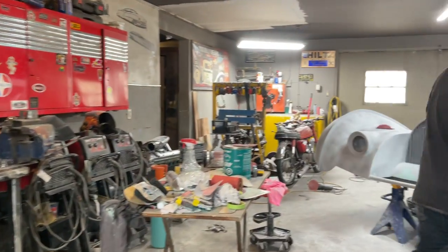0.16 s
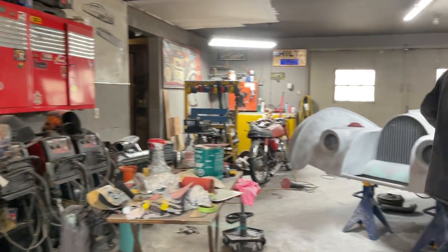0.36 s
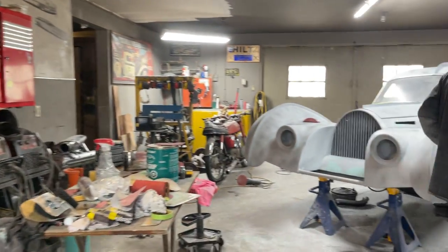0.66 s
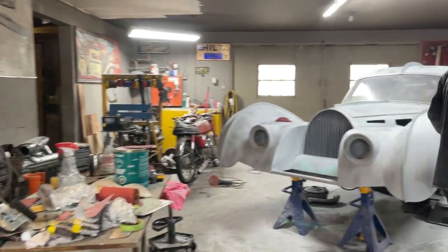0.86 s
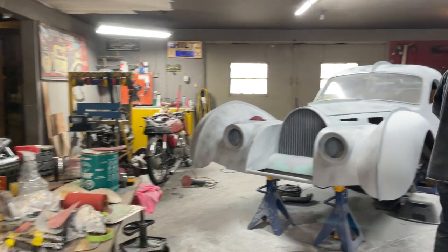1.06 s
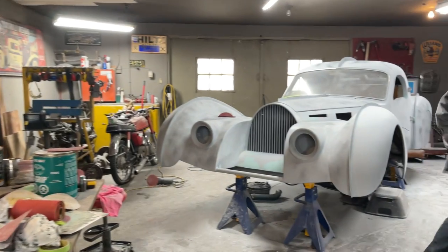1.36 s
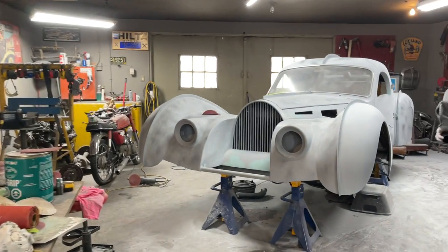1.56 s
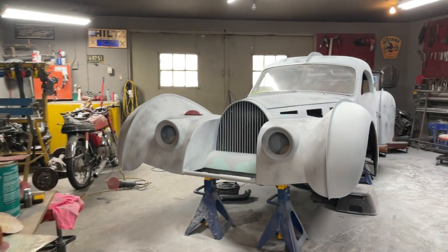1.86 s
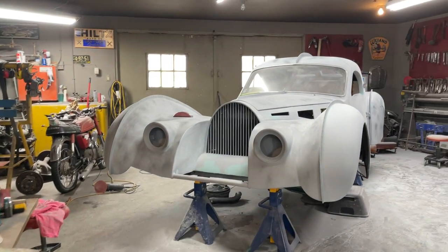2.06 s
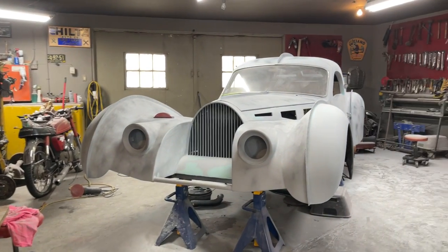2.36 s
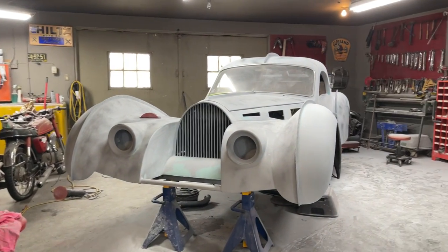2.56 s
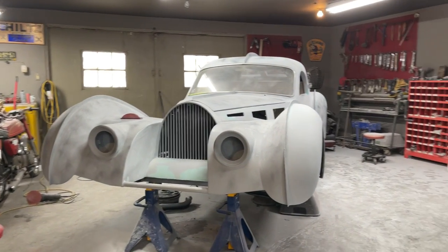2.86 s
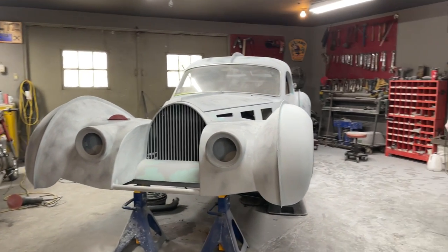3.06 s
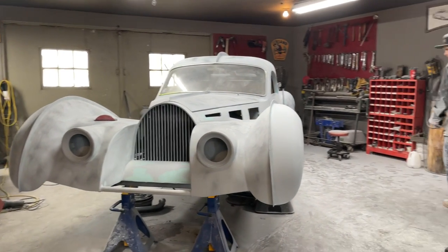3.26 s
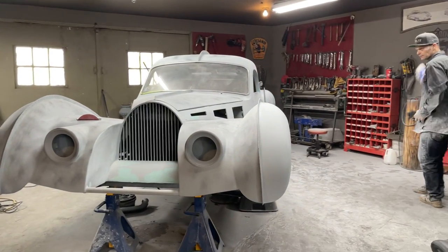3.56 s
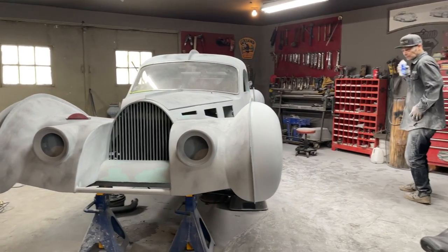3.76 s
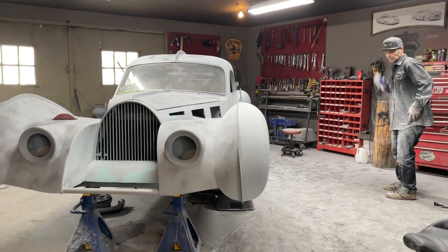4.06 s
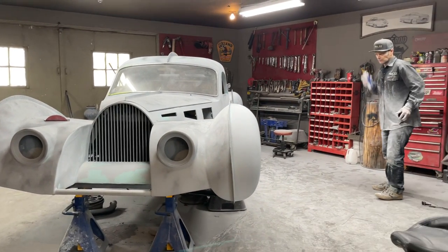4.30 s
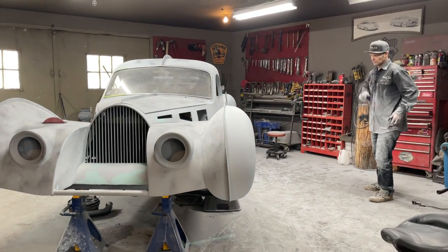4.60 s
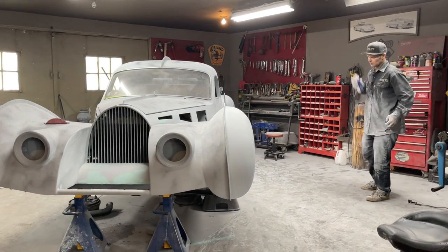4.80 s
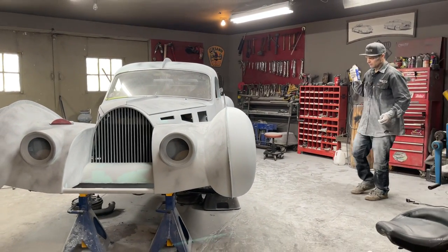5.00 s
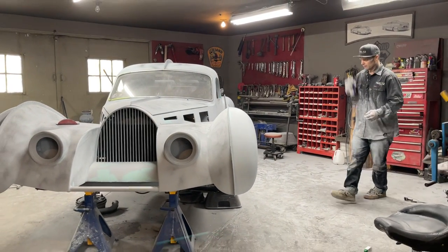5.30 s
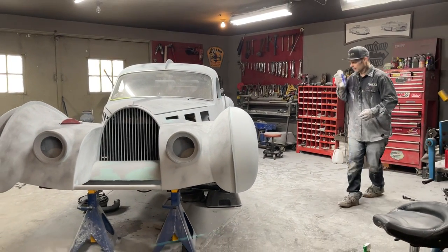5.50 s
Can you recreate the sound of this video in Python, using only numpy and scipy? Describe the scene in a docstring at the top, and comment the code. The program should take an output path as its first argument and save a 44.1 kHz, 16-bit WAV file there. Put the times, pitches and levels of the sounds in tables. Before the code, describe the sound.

A spray can is handled and shaken in a concrete workshop. At the start there is quiet hiss and a soft scuff, then a clear hollow knock at about 0.2 s, faint bright metal clinks from 0.3 to 0.7 s, and a small loose ball rattle with a rub near 0.5-0.6 s. From about 0.77 s the shaking begins and runs to the end at about 5.6 s, roughly four strokes a second. Each stroke opens with one or two sharp, heavily damped metallic clacks, then lighter irregular taps bounce toward the duller wall. Faint grainy paint slosh runs underneath. A slight knock and scuff near 3.2 s are almost buried. Short near echoes blur the hits and a diffuse tail follows, its treble dying first. Low air and hand rumble swells slightly around 4.8 s, with occasional dull microphone bumps. The hardest blows flatten and distort a little.

```python
"""A rattling steel ball: a spray can is picked up and shaken in a concrete workshop, about four strokes a second.
The ball hits the can's ends and bounces along the wall; paint and hand damp most of its rings to a few ms.
Before and between come knocks, clinks and scuffs of handling, with the slosh of paint during the shaking.
Nearby surfaces give short echoes, walls and floor a diffuse tail, behind it all a flickering hiss.
Air and hand movement rumble on the microphone, whose input overloads on the hardest blows."""
import sys
import numpy as np
from scipy import signal
from scipy.io import wavfile
from scipy.ndimage import uniform_filter1d

SR = 44100
rng = np.random.default_rng(int(sys.argv[2]) if len(sys.argv) > 2 else 0)


def output_pcm(signal):
    """Save a mono or channel-first signal as 16-bit PCM at the path in sys.argv[1].

    Samples are clipped to [-1, 1] before scaling.
    """
    pcm = np.clip(np.atleast_2d(signal).T, -1, 1) * 32767
    wavfile.write(sys.argv[1], SR, np.round(pcm).astype(np.int16))


N = 248635  # samples


# distinct ball impacts inside the can: start_s [s], peak_db [dB],
# wall_db [dB, wall thud re dome ring], tick_db [dB, tick re dome ring]
BALL_HITS = [(0.5229, -15.5, -6, -4.5), (.5628, -17.5, -8, -8), (0.573, -21, 1, -10), (0.5819, -25, 0, -8),
             (.634, -29.5, 7, -2), (0.7673, -8, -21, -7.5), (0.7931, -2.5, -12.5, -9),
             (0.7995, -16.5, -16, -19), (0.8083, -18, -1, -21), (0.8658, -11.5, -2, -8),
             (0.8707, -17, 6, -17), (0.9184, -22, -4, -13), (.953, 4.5, -12.5, -7.5),
             (0.9592, -22, -12, -5), (0.9629, -10, -15, -21), (1.0205, -13.5, -14, -7),
             (1.0817, -15, 0, -4), (1.1166, -18, -5, -5), (1.1872, -23, -2, -24), (1.191, 3.5, -12.5, -17),
             (1.233, -3.5, -23, -14), (1.2527, -17.5, -10, -3), (1.2641, -14.5, -8, -24),
             (1.3205, -16.5, -1, -4), (1.3521, -23, 7.5, -21), (1.4277, -4, -16, -11.5),
             (1.4298, -1, -9.5, -16), (1.4831, -18, -1, -13), (1.5651, -15.5, -3.5, 0),
             (1.6492, 3.5, -21, -14.5), (1.6633, -1.8, -12, -16), (1.6804, -5.5, -10, -18),
             (1.7126, -16, -22, -12), (1.7281, -16.5, -5, -12), (1.738, -14.4, -18, -8),
             (1.8056, -15, -1, -4.5), (1.8799, 3, -22, -12), (1.8982, -8.5, -7, -12.5),
             (1.9253, -12.5, -8, -17), (1.9722, -13.5, -15, -6.5), (1.9834, -16, 2, -13),
             (2.0033, -21, 4, -6), (2.047, -11, -2.5, -0.5), (2.1291, 3.5, -9.5, -9),
             (2.135, -21, -12, -12), (2.1444, -16, -30, -15), (2.1514, -16, -19, -1),
             (2.1723, -2.5, -35, -7), (2.1842, -11.5, -7.5, -1), (2.1904, -14.5, -14, -8),
             (2.1975, -16, -5, -4), (2.256, -15, 0, -4.5), (2.3582, 4, -13, -38), (2.3918, -6.5, -7, -31),
             (2.3957, -14, -10, -18), (2.451, -16, -8, -1), (2.5235, -12.5, -0.5, -7), (2.56, -18, 0, -4.5),
             (2.611, 0.5, -32, -11), (2.6245, -5, -12, -14), (2.6448, -4.5, -25, -16),
             (2.67, -14, -1.5, -7), (2.6874, -9, -12, -8), (2.6948, -17, -1, -3.5), (2.7042, -13.5, -3, -7),
             (2.786, -11.5, -7.5, -7.5), (2.8663, 0.5, -15, -14), (2.878, -0.5, -8.5, -13),
             (2.9, -12.5, -22, -9.5), (2.9988, -19.5, 9, -20), (3.0281, -17.5, -6, -3),
             (3.0435, -16.5, 2, -19), (3.0738, -24.5, 0, -3), (3.1046, 0, -9.5, -13),
             (3.1221, -5, -7.5, -24), (3.151, -10.5, -19, -13), (3.182, -11.5, -7, -11),
             (3.1945, -14.5, -2, -1), (3.2052, -8.5, -13, -7), (3.2152, -21, -2, -19),
             (3.2594, -11, -0.5, -8.5), (3.2664, -19, 11, 1), (3.307, -22, 5, -8), (3.357, -3, -14, -24),
             (3.3597, -15.5, 3, -25), (3.367, -6, -8, -25), (3.377, -24, -15, -12),
             (3.3883, -10.5, -11, -16), (3.4598, -7, -8, -8.5), (3.5273, -11, -5.5, -6),
             (3.6246, -1, -9, -8.5), (3.6254, 3, -22, -22), (3.6319, -9, -24, -20), (3.6643, -5.5, -18, -8),
             (3.7477, -17, -2, 0), (3.8425, 2.3, -11.5, -11.5), (3.8517, -19, -24, -13),
             (3.869, -2, -28, -15), (3.8833, -7.5, -18, -11), (3.903, -12, -8.5, -22),
             (3.9298, -15.5, -7, -12), (3.9363, -17.5, -1, -3), (3.9436, -13, -30, -10),
             (3.973, -19, 3, -11), (4.0246, -13, -7.5, -6), (4.1026, 3.5, -8, -12), (4.1107, -17, -34, -1),
             (4.1254, -11, -4, -15), (4.1515, -4.5, -12, -8), (4.1645, -16, -28, -23), (4.173, -16, -5, -5),
             (4.2313, -11, -5, -11), (4.2336, -15.5, 1, -5), (4.28, -17.5, 0, -9), (4.3345, -1.5, -8, -17),
             (4.3888, -7, -16, -22), (4.3968, -20, -21, -6), (4.416, -15, -9, -8), (4.4763, -15, 1, -3),
             (4.518, -19.5, -3, 0), (4.5657, 1.5, -11, -11), (4.587, -3.5, -9.5, -16),
             (4.6132, -18, -20, -8), (4.6233, -8, -12, -29), (4.6628, -10.5, -6.5, -14),
             (4.674, -17.5, -9, -5), (4.6845, -18, 17, -10), (4.7372, -18, 1, -8), (4.824, 2.5, -13.5, -9),
             (4.8561, -7.5, -10, -28), (4.882, -15, -25, -9), (4.9263, -16, -6, -4.5),
             (4.9871, -13, -3, -36), (5.0694, 2, -8.5, -8.5), (5.1217, -3.5, -20, -10),
             (5.125, -7.3, -13, -23), (5.1718, -7, -8.5, -10), (5.2558, -12, -8.5, -5),
             (5.2597, -20, 0, -5), (5.34, -4, -8, -11.5), (5.346, -1.5, -29, -14),
             (5.3488, -4, -1.5, -15.5), (5.3709, -17, 4, -8), (5.3867, -3.5, -32, -12),
             (5.3967, -13, -22, -5), (5.4686, -11, -1.5, -12), (5.5707, 2, -12, -12),
             (5.5955, 0, -36, -9.5)]
# a low thump as the microphone's input overloads on the hardest blows: start_s [s], peak_db [dB]
HARD_THUDS = [(0.955, -27), (2.3576, -26), (3.6249, -18.5)]
# broad, heavily damped resonances of the filled can; all: pitch_hz [Hz], width_hz [Hz], level_db [dB, relative]
WALL_PEAKS = [(1046, 660, -3), (1780, 620, 1.5)]
DOME_PEAKS = [(2610, 890, -2.5), (3546, 810, 1.5), (4500, 1270, -1.5), (6066, 1970, -6.5)]
# bright tick of the ball's contact: same columns
TICK_PEAKS = [(7825, 1930, 4.5), (12440, 3300, -7)]
# longer rings of the thin shell: same columns
SHELL_PEAKS = [(2400, 180, -6), (3170, 130, 1), (3730, 130, 3), (4540, 81, 3), (5500, 180, 0)]
# the low thud under the blows: same columns
THUD_PEAKS = [(263, 660, 0)]
# surfaces near the can: mean_delay_s [s], mean_level_db [dB re the hit's peak]
NEAR_ECHOES = [(.006, -22), (.0095, -23), (.015, -32)]
CHATTER_S, TICK_DECAY_S = 0.00073, 0.0021  # time constants: contact chatter, force behind the tick
SHELL_DB = -21  # shell ring re dome ring
THUD_DB, THUD_SPREAD_DB = -32.5, 3.6  # low thud re dome ring: mean and spread
ECHO_SHIFT_S, ECHO_SPREAD_DB = 0.00095, 5.1  # spread of each echo


def ball():
    """Each impact is a sharp blow with a brief random chatter, coloured by wall, dome and ball."""
    start_s, peak_db, wall_db, tick_db = np.vstack([BALL_HITS, taps()]).T
    size = 1024
    t = np.arange(size) / SR
    brief = np.exp(-t / TICK_DECAY_S)  # the treble dies first

    def can(force):
        """Dome, wall and tick resonate side by side under one force."""
        smooth = band(force, 446, 15000)
        dome = resonate(smooth, DOME_PEAKS)
        wall = undb(wall_db)[:, None] * resonate(smooth, WALL_PEAKS)
        tick = undb(tick_db)[:, None] * resonate(smooth * brief, TICK_PEAKS)
        return dome + wall + tick

    blow = np.zeros((len(start_s), size))
    blow[:, 6] = 2.52
    chatter = rng.standard_normal(blow.shape) * np.exp(-t / CHATTER_S)
    force = blow + chatter
    heard = can(force)

    # the thin shell sings on faintly; blows also carry a faint low thud
    shell = undb(SHELL_DB) * resonate(force, SHELL_PEAKS)
    thud_db = THUD_DB + THUD_SPREAD_DB * rng.standard_normal((len(start_s), 1))
    thud = undb(thud_db) * resonate(blow, THUD_PEAKS)
    direct = place(start_s - .0002, peak_db, heard + shell + thud, rise_s=0.00018)
    hard_thuds = resonate(blow[:len(HARD_THUDS)], THUD_PEAKS)
    direct = direct + place(*np.transpose(HARD_THUDS), hard_thuds, rise_s=0.00044)

    # the can keeps moving, so near echoes shift in time and strength from hit to hit
    chance = rng.standard_normal((len(start_s), len(NEAR_ECHOES), 2))
    echo = band(heard, 540, 10000, order=1)
    for k, (delay_s, echo_db) in enumerate(NEAR_ECHOES):
        echo_s = start_s + delay_s + ECHO_SHIFT_S * chance[:, k, 0]
        level_db = peak_db + echo_db + ECHO_SPREAD_DB * chance[:, k, 1]
        direct = direct + place(echo_s, level_db, echo, rise_s=0.00029)

    # the room sums all directions and hears a more even colour; hits take turns at five spots
    spread = can(blow) + 0.63 * heard
    spot = np.arange(len(start_s)) % 5
    tail = 0
    for k in range(5):
        here = spot == k
        tail = tail + workshop(place(start_s[here], peak_db[here], spread[here], rise_s=0.00024))
    return direct + tail


SLAM_DB, STROKE_GAP_S = -7.5, .15  # a blow above this level after such a pause opens a stroke
FLIGHT_S = .03  # the ball flies free just before the next stroke
TAPS_PER_STROKE = 5
TAP_DB, TAP_SPREAD_DB, TAP_FADE_DB_PER_S = -22, 2.5, 16.5
# mean wall and tick levels re dome ring, their spread, and the wall's rise through the stroke
TAP_WALL_DB, TAP_TICK_DB, TAP_COLOUR_DB, TAP_WALL_DB_PER_S = -9, -8, 5, 60


def taps():
    """Light random taps fade and move from dome to wall through each stroke; rows like the ball's blows."""
    hit_s, hit_db = np.transpose(BALL_HITS)[:2]
    hard_s = hit_s[hit_db > SLAM_DB]
    stroke_s = hard_s[np.diff(hard_s, prepend=0) > STROKE_GAP_S]
    length_s = np.diff(stroke_s, append=N / SR + FLIGHT_S) - FLIGHT_S
    # one tap at a random moment in each equal share of the stroke
    share = np.arange(TAPS_PER_STROKE) + rng.random((len(stroke_s), TAPS_PER_STROKE))
    late_s = (share / TAPS_PER_STROKE * length_s[:, None]).ravel()
    chance = rng.standard_normal((len(late_s), 3)).T
    start_s = np.repeat(stroke_s, TAPS_PER_STROKE) + late_s
    peak_db = TAP_DB - TAP_FADE_DB_PER_S * late_s + TAP_SPREAD_DB * chance[0]
    wall_db = TAP_WALL_DB + TAP_WALL_DB_PER_S * late_s + TAP_COLOUR_DB * chance[1]
    tick_db = TAP_TICK_DB + TAP_COLOUR_DB * chance[2]
    return np.transpose([start_s, peak_db, wall_db, tick_db])


SHAKE_START_S, SLOSH_DB = 0.755, -56  # the slosh's start and rms level


def paint():
    """Liquid thrown about inside the can: a grainy slosh of noise with a fast random level."""
    fade_in = np.clip((np.arange(N) / SR - SHAKE_START_S) / 0.048, 0, 1)
    slosh = band(rng.standard_normal(N), 900, 4000, order=1) * undb(4 * walk(200))
    return fade_in * undb(SLOSH_DB) * unit(slosh)


# hollow knocks, most as the can is picked up: start_s [s], peak_db [dB], crack_db [dB, gain of the noisy crack]
KNOCK_HITS = [(.127, -28.5, -11), (.2145, -10, -13), (.2175, -16, 9.5), (0.2248, -22.5, 15),
              (3.234, -27, -15)]
# hollow modes of the knocks: pitch_hz [Hz], level_db [dB, relative], t60_s [s]
KNOCK_RINGS = [(244, -12.5, 0.028), (567, -7.5, 0.034), (790, -0.5, 0.03), (970, -6, 0.031),
               (1800, -9.5, 0.022), (2940, -13, 0.019)]


def knocks():
    """Hollow knocks: low, short-lived modes with a noisy crack."""
    start_s, peak_db, crack_db = np.transpose(KNOCK_HITS)
    return struck(start_s, peak_db, KNOCK_RINGS, crack_db, rise_s=0.00095)


# small metal clinks: start_s [s], peak_db [dB]
CLINK_HITS = [(.319, -22.5), (.353, -26), (.358, -23), (.381, -38), (.396, -43), (.48, -36.5), (.641, -38),
              (.675, -37), (.701, -42), (.711, -41)]
# bright modes of the clinks: pitch_hz [Hz], level_db [dB, relative], t60_s [s]
CLINK_RINGS = [(1750, -12, .01), (3300, -10, .008), (4000, -8, .01), (4450, -2, .016), (4600, -3, .016),
               (6700, -6, .008), (7750, -3, .016), (8600, -9, .008), (10800, -10, .008), (12500, -14, .01)]


def clinks():
    """Small metal clinks: high modes gone within some 16 ms, with a strong noisy crack."""
    start_s, peak_db = np.transpose(CLINK_HITS)
    crack_db = np.full(len(start_s), 11)
    return struck(start_s, peak_db, CLINK_RINGS, crack_db, rise_s=0.00028)


# soft scuffs of hand, can and shoes, and one brief slosh of paint (0.58 s): centre_s [s], length_s [s, between
# 1/e points], level_db [dB, rms before the swell], pitch_hz [Hz, band centre]
SCUFF_RUBS = [(0.04, 0.025, -46, 490), (0.176, 0.053, -47.5, 1800), (0.424, 0.21, -55, 4500),
              (.582, 0.05, -38.5, 1470), (0.721, 0.027, -55.5, 5500), (3.01, 0.029, -48.5, 500),
              (3.255, 0.097, -43, 790)]


def scuffs():
    """Short grainy rubs: one noise band each, swelling and fading smoothly."""
    t, out = np.arange(N) / SR, 0
    for centre_s, length_s, level_db, pitch_hz in SCUFF_RUBS:
        noise = band(rng.standard_normal(N), pitch_hz / 1.65, pitch_hz * 1.37)
        rub = unit(noise * undb(5.8 * walk(150)))
        swell = np.exp(-(2 * (t - centre_s) / length_s) ** 2)
        out = out + undb(level_db) * rub * swell
    return out


# the concrete workshop's tail by band: pitch_hz [Hz], level_db [dB, noise gain], t60_s [s]
ROOM_BANDS = [(310, -44, 0.91), (583, -46, 0.88), (1184, -43, 0.96), (2140, -46, 0.89), (3620, -42, 0.51),
              (5570, -45, 0.52), (7250, -51, 0.28), (10000, -38, 0.18), (13500, -49, 0.25)]
FIRST_WALL_S, BUILD_S = .004, .007  # silence before the tail, time constant of its growth


def workshop(dry):
    """A diffuse tail of noise bands builds after the first wall and dies sooner in the treble."""
    t = np.arange(int(1.1 * SR)) / SR
    build = 1 - np.exp(-np.maximum(t - FIRST_WALL_S, 0) / BUILD_S)
    reply = 0
    for pitch_hz, level_db, t60_s in ROOM_BANDS:
        noise = band(rng.standard_normal(len(t)), pitch_hz / 1.21, pitch_hz * 1.346)
        reply = reply + undb(level_db - 60 * t / t60_s) * noise
    return signal.fftconvolve(dry, reply * build)[:N]


# hiss of the room: pitch_hz [Hz], level_db [dB per Hz, relative]
AIR_BANDS = [(150, -16), (300, -8), (600, 4.5), (1500, -2), (4000, -10), (8000, -25), (15000, -50)]
AIR_DB = -55  # rms of the whole hiss


def air():
    """Quiet hiss of the room: noise bands, each flickering a little."""
    hiss = 0
    for pitch_hz, level_db in AIR_BANDS:
        flicker = undb(level_db + 3.5 * walk(7.6))
        hiss = hiss + flicker * band(rng.standard_normal(N), pitch_hz / 1.08, pitch_hz * 1.76)
    return undb(AIR_DB) * unit(hiss)


# drift of the rumble at the microphone: time_s [s], level_db [dB, deep band]
RUMBLE_DRIFT = [(0, -47), (2.76, -43), (4.38, -44), (4.84, -38.5), (5.64, -44.5)]
# dull bumps on the microphone: start_s [s], peak_db [dB], pitch_hz [Hz]
MIC_BUMPS = [(.721, -37.5, 94), (2.288, -35.5, 46), (2.638, -31, 62.3), (4.263, -37, 46), (4.501, -34, 72),
             (5.504, -35, 55)]
UPPER_RUMBLE_DB = -12.5  # upper band re deep band


def rumble():
    """Low pressure swings on the microphone share one uneven gust; bumps are single decaying sines."""
    time_s, level_db = np.transpose(RUMBLE_DRIFT)
    gust = walk(9)
    deep = unit(band(rng.standard_normal(N), 13.2, 28.1, order=1) * undb(2.9 * gust))
    upper = unit(band(rng.standard_normal(N), 53, 115, order=1) * undb(3.4 * gust))
    drift = undb(np.interp(np.arange(N) / SR, time_s, level_db))
    start_s, peak_db, pitch_hz = np.transpose(MIC_BUMPS)[..., None]
    thumps = rings(pitch_hz, 1 + 0 * pitch_hz, 7 / pitch_hz, 0 * pitch_hz, size=8192)
    bumps = place(start_s[:, 0], peak_db[:, 0], thumps, rise_s=0.0073)
    return drift * (deep + undb(UPPER_RUMBLE_DB) * upper) + bumps


def struck(times, peak_db, modes, crack_db, rise_s):
    """Blows on one object: its modes, stirred a little each time, plus a noisy crack."""
    size = 4096
    hz, db, t60 = np.transpose(modes)
    chance = rng.standard_normal((len(times), 3, len(hz)))
    pitch = hz * (1 + 0.0044 * chance[:, 0])
    gain = undb(db + 2.8 * chance[:, 1])
    tone = rings(pitch, gain, t60 + 0 * pitch, 0.74 * chance[:, 2], size)
    crack = band(rng.standard_normal((len(times), size)), 1360, 7000)
    crack = crack * np.exp(-np.arange(size) / SR / 0.0019)
    return place(times, peak_db, tone + undb(crack_db)[:, None] * crack, rise_s)


def resonate(x, peaks):
    """Parallel resonances of alternating sign along the last axis; each row leaves with unit energy."""
    y = 0
    for k, (hz, width_hz, db) in enumerate(peaks):
        b, a = signal.iirpeak(hz, hz / width_hz, fs=SR)
        y = y + (-1) ** k * undb(db) * signal.lfilter(b, a, x)
    return y / np.linalg.norm(y, axis=-1, keepdims=True)


def rings(hz, gain, t60, phase, size):
    """Sum of decaying sines; arguments are events x modes, the result events x size."""
    t = np.arange(size) / SR
    decay = np.exp(-np.log(1000) * t / t60[..., None])
    sine = np.sin(2 * np.pi * hz[..., None] * t + phase[..., None])
    return np.sum(gain[..., None] * decay * sine, axis=1)


def place(times, peak_db, sounds, rise_s):
    """Lay each sound at its time with its peak level, after a short rise."""
    size = sounds.shape[1]
    out = np.zeros(N + size)
    sounds = sounds * (1 - np.exp(-(np.arange(size) / SR / rise_s) ** 2))
    for s, db, sound in zip(times, peak_db, sounds):
        i = min(int(s * SR), N)
        out[i:i + size] += undb(db) * sound / np.abs(sound).max()
    return out[:N]


def walk(rate):
    """Random levels of unit rms, held 1 / rate s and slewed twice."""
    k = int(SR / rate)
    held = np.repeat(rng.standard_normal(N // k + 1), k)
    return unit(uniform_filter1d(uniform_filter1d(held, k), k)[:N])


def band(x, lo_hz, hi_hz, order=2):
    """Band-pass along the last axis."""
    edges = [lo_hz, min(hi_hz, .45 * SR)]
    return signal.sosfilt(signal.butter(order, edges, "band", fs=SR, output="sos"), x)


def unit(x):
    """Scale to unit rms."""
    return x / np.sqrt(np.mean(x ** 2))


def undb(db):
    """Decibels to amplitude."""
    return 10 ** (np.asarray(db) / 20)


def scene():
    """The shaken can, its handling with the workshop's tail, and the background at the microphone."""
    dull = knocks() + scuffs()
    bright = clinks()
    handling = dull + bright + workshop(undb(-2.0) * dull + bright)
    return (ball() + paint() + handling + air() + rumble())[None]


SKEW, CEILING = .06, .6  # lopsided bend and flat top of the microphone's input
TOP_HZ = 17000


def record(dry):
    """The input stage bends lopsidedly and flattens the hardest blows; the top is cut."""
    bent = dry + SKEW * dry ** 2
    flat = bent / (1 + np.abs(bent / CEILING) ** 4) ** (1 / 4)
    return signal.sosfilt(signal.ellip(12, .3, 110, TOP_HZ, fs=SR, output="sos"), flat)


dry = scene()
out = record(dry)
output_pcm(out)
```